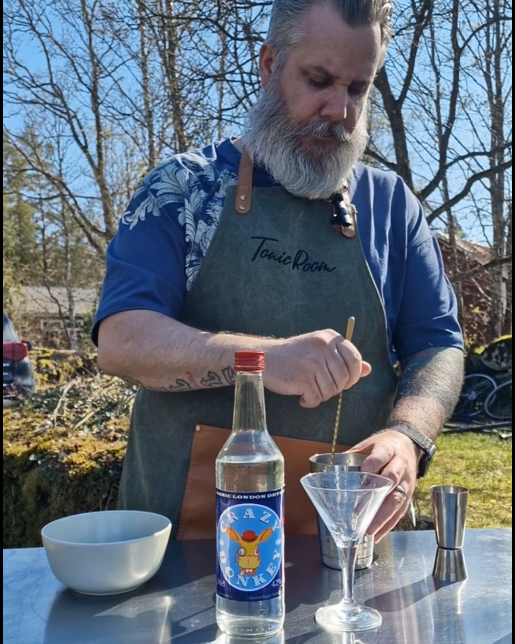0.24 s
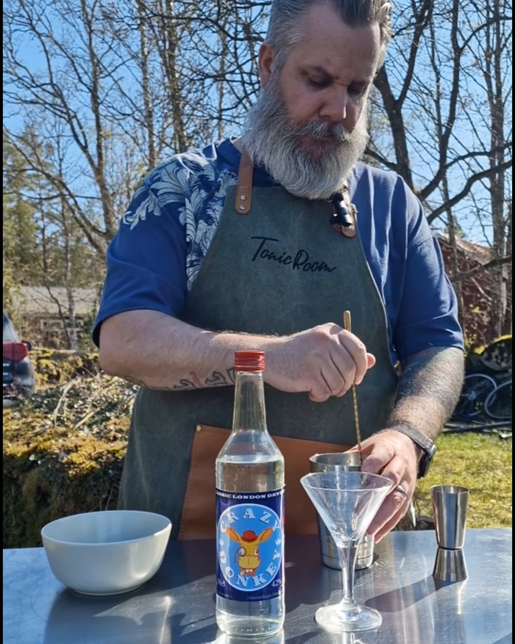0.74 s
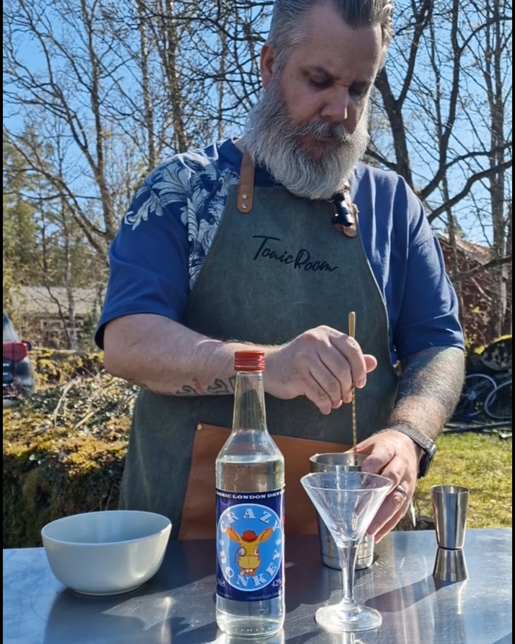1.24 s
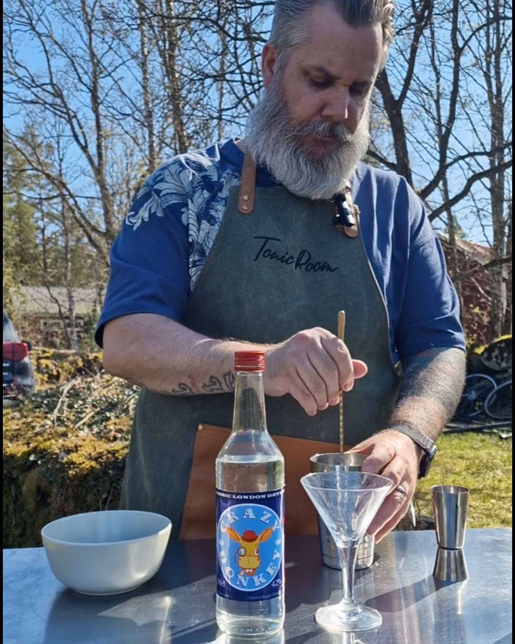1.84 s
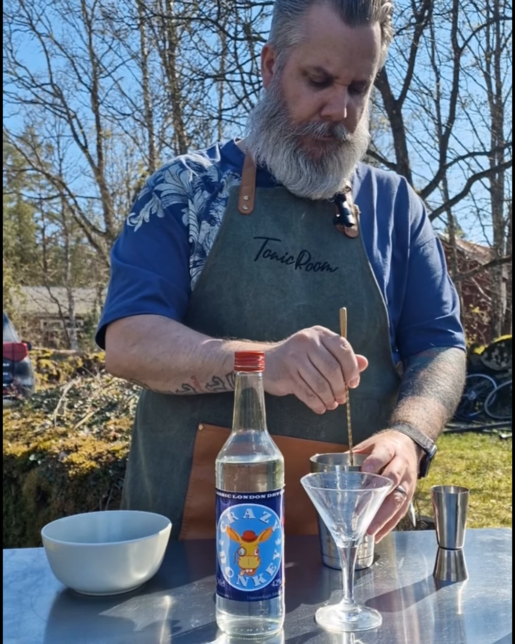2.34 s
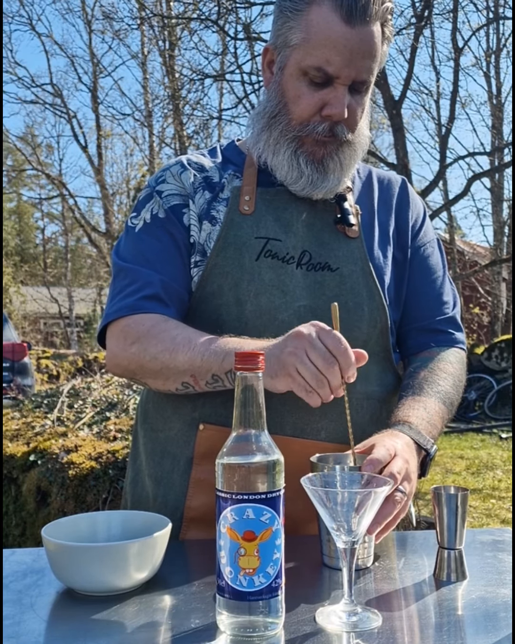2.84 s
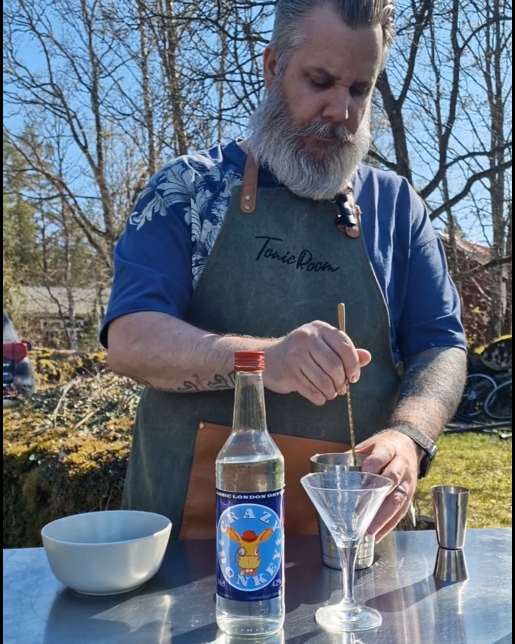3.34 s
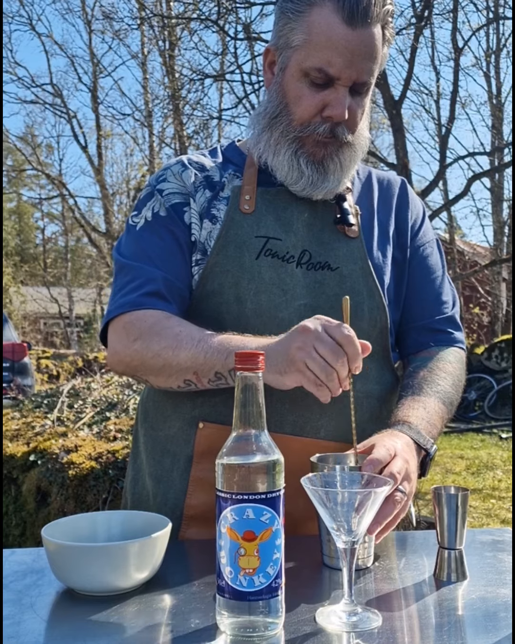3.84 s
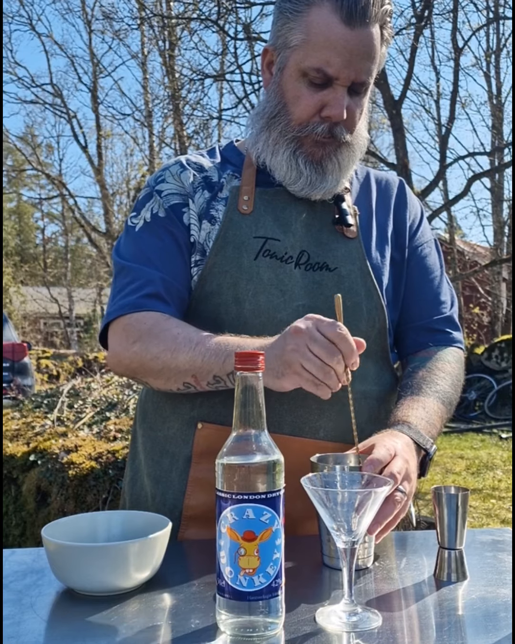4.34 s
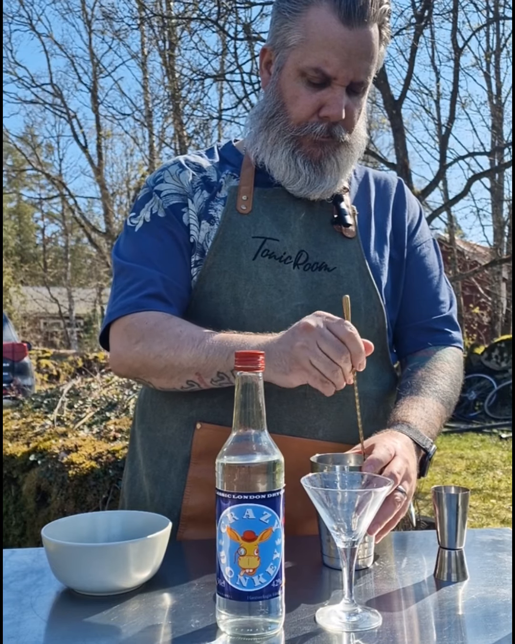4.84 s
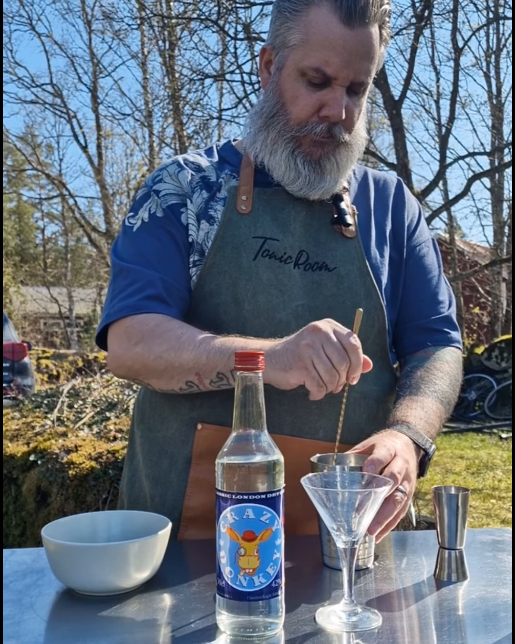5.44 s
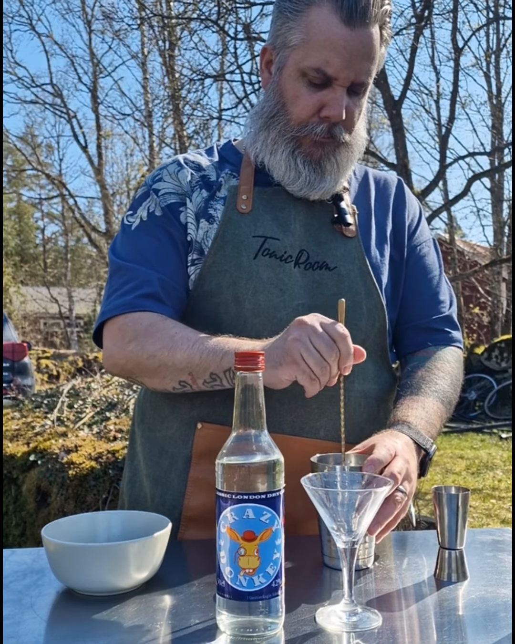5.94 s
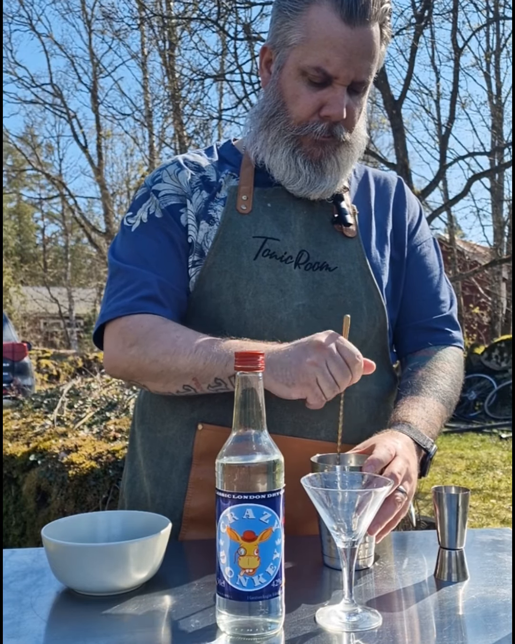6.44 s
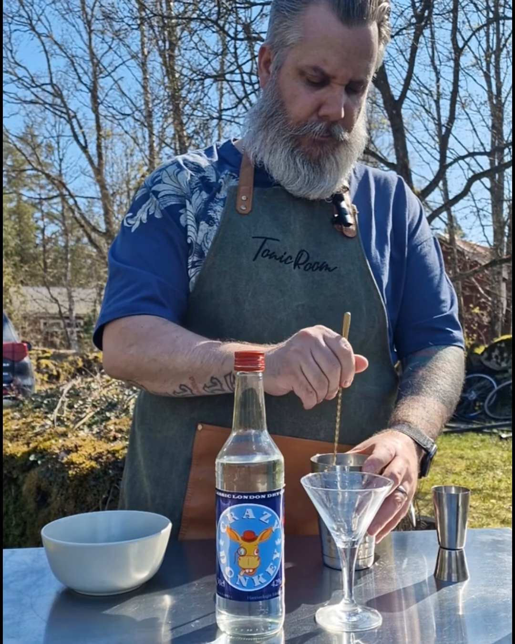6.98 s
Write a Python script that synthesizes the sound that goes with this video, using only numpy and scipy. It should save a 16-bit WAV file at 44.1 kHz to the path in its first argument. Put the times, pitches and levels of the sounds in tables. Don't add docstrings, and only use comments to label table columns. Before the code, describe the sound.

Close outdoor take of a spoon stirring ice and liquid in a steel tin on a thin metal table. A dense burst of clinks and hollow gulps, a short near-silent pause, then steady irregular knocking and gritty scraping with low table bumps. It thins out in the last second or so. Wind softly buffets the microphone over a very faint hiss.

```python
import sys
import numpy as np
from scipy import signal
from scipy.fft import rfft, irfft
from scipy.io import wavfile

SR = 44100
rng = np.random.default_rng(int(sys.argv[2]) if len(sys.argv) > 2 else 0)


def ratio_of_db(decibels):
    return 10 ** (np.asarray(decibels, float) / 20)


def bounce(signal):
    frames = np.transpose(np.atleast_2d(signal))
    limited = np.clip(frames, -1, 1)
    pcm = np.round(limited * 32767).astype(np.int16)
    wavfile.write(sys.argv[1], SR, pcm)


N = 317942

# f/Hz, level/dB, t60/s
WALL_MODES = [(1200, -24.5, 0.025), (1371, -7, 0.073), (2058, -5, 0.085), (2250, 0, 0.038),
              (2360, -9.5, 0.12), (2770, -3, 0.073), (3290, 0.5, 0.053), (3546, 0, 0.035), (3796, 1, 0.022),
              (4090, -4.5, 0.033), (4413, 1.5, 0.017), (4754, 5, 0.025), (4950, -4.5, 0.054),
              (5620, -8.5, 0.048), (6690, -9, .04), (7320, -12, 0.038), (8304, -7, 0.025),
              (8950, -11.5, 0.037), (11400, -46, .02), (13820, -27, .015)]
# f/Hz, level/dB, t60/s
CAVITY_MODES = [(517, -14, 0.17), (585.4, -9.5, 0.12), (716.6, -4, 0.13), (784.6, 3.5, 0.074),
                (860, -7, .06), (1067, -18.5, 0.063)]
# f/Hz, level/dB, t60/s
TABLE_MODES = [(70, -21, 0.094), (139.3, 1, 0.17), (239, -10.5, 0.25), (276, 4.5, 0.13),
               (409.4, -3.5, 0.09)]


def rms_one(x):
    return x / np.sqrt(np.mean(x ** 2) + 1e-20)


def in_time(rows):
    t_s, *columns = np.transpose(rows)
    return [np.interp(np.arange(N) / SR, t_s, column) for column in columns]


def band(x, low_hz, high_hz):
    return signal.sosfilt(signal.butter(2, [low_hz, high_hz], "band", fs=SR, output="sos"), x)


def drift(rate_hz):
    hop = 40
    pole = np.exp(-2 * np.pi * rate_hz * hop / SR)
    noise = rng.standard_normal(N // hop + 2002)
    slow = signal.lfilter([1], [1, -2 * pole, pole * pole], noise)[2000:]
    return np.interp(np.arange(N) / hop, np.arange(len(slow)), rms_one(slow))


def ring(force, f_hz, t60_s):
    radius = ratio_of_db(-60 / (t60_s * SR))
    angle = 2 * np.pi * f_hz / SR
    feedback = [1, -2 * radius * np.cos(angle), radius * radius]
    return signal.lfilter([0, np.sin(angle)], feedback, force + 1e-18)


def place(shapes, times_s):
    length = shapes.shape[1]
    out = np.zeros(N + length)
    starts = np.round(np.asarray(times_s) * SR).astype(int)
    np.add.at(out, starts[:, None] + np.arange(length), shapes)
    return out[:N]


def garden():
    # f/Hz, level/dB
    spectrum = [(24, -50), (40, -19.5), (643, -18.5), (765, -19), (1110, -29.5), (2850, -16.5),
                (3300, -17.5), (3830, -14.5), (15000, -43.5)]
    knot_hz, knot_db = np.transpose(spectrum)
    f_hz = np.maximum(np.arange(N // 2 + 1) * SR / N, 20)
    colour = ratio_of_db(np.interp(np.log(f_hz), np.log(knot_hz), knot_db))
    hiss = rms_one(irfft(rfft(rng.standard_normal(N)) * colour, N))
    return ratio_of_db(-61 + 2.4 * drift(6.2)) * hiss


def wind():
    # t/s, buffet level/dB
    gusts = [(0.0, -48), (0.16, -22), (0.2, -42), (0.66, -35.5), (1.26, -81), (1.55, -64), (1.72, -11.5),
             (2.09, -14), (2.21, -38), (2.71, -35.5), (2.79, -23), (3.13, -71), (3.31, -36), (3.47, -56),
             (3.55, -41), (3.82, -72), (4.01, -8), (4.2, -22), (4.24, -37), (4.56, -20.5), (4.6, -49),
             (4.86, -34), (4.92, -48), (5.0, -24), (5.16, -58), (5.32, -28), (5.38, -77), (5.88, -30.5),
             (6.0, -74.5), (6.26, -71.5), (6.4, -10.5), (6.93, -35), (7.21, -31)]
    buffet_db, = in_time(gusts)
    lumps = ratio_of_db(3.0 * drift(13))
    low = rms_one(band(band(rng.standard_normal(N), 53, 126), 35, 290))
    edge = rms_one(band(rng.standard_normal(N), 210, 540))
    return ratio_of_db(buffet_db) * rms_one(lumps * (low + ratio_of_db(-25.5) * lumps * edge))


def grit(per_s, spread_db):
    sizes = ratio_of_db(spread_db * np.minimum(rng.exponential(1, N), 5))
    signs = rng.choice([-1, 1], N)
    return sizes * signs * (rng.random(N) < per_s / SR)


def grind(modes, contacts, wander_db):
    out = np.zeros(N)
    for f_hz, level_db, t60_s in modes:
        force = contacts * ratio_of_db(level_db + wander_db * drift(9.3))
        out += ring(force, f_hz, t60_s)
    return rms_one(out)


def stir():
    # t/s, wall level/dB, cavity level/dB, table level/dB
    strokes = [(0.0, -26.5, -22.5, -38), (0.16, -32, -34.5, -61), (0.38, -27, -37.5, -36),
               (0.56, -30.5, -21, -44), (0.74, -56.5, -35.5, -39), (1.06, -50, -54, -64),
               (1.4, -61, -53, -69), (1.65, -25.5, -34, -56), (1.79, -42, -47, -37), (2.01, -29, -24, -29),
               (2.25, -34.5, -26, -43), (2.41, -40, -47, -49), (2.65, -35, -35.5, -60),
               (2.85, -38.5, -19, -58), (3.01, -37, -42, -58), (3.21, -41.5, -33, -60),
               (3.41, -27, -25.5, -45), (3.69, -41.5, -32, -50), (3.95, -25, -30, -54),
               (4.1, -34.5, -53, -42), (4.36, -43, -37, -50), (4.54, -28.5, -42.5, -37),
               (4.86, -25.5, -23, -43.5), (5.16, -37.5, -62, -59), (5.3, -26, -37, -57),
               (5.52, -65, -46.5, -43.5), (5.7, -36.5, -56, -45), (5.78, -44, -46, -45),
               (5.94, -51, -56, -58), (6.28, -72, -95, -96), (6.49, -46.5, -44, -51),
               (6.87, -38.5, -38, -45.5), (7.21, -35, -35, -55)]
    wall_db, cavity_db, table_db = in_time(strokes)
    contacts = grit(per_s=1500 * ratio_of_db(3.6 * drift(25)), spread_db=3.0)
    scrape = rms_one(band(contacts, 1300, 9800))
    wall = grind(WALL_MODES, contacts, wander_db=11.5) + ratio_of_db(-20) * scrape
    cavity = grind(CAVITY_MODES, contacts, wander_db=11.0)
    table = grind(TABLE_MODES[1:], contacts, wander_db=1.5)
    return ratio_of_db(wall_db) * wall + ratio_of_db(cavity_db) * cavity + ratio_of_db(table_db) * table


def knocks():
    # t/s, clink peak/dB, cavity level/dB, table level/dB, brightest ring f/Hz, rattle length/s
    hits = [(0.0226, -16.5, -12.5, -13, 2700, 0.012), (0.084, -13.5, -20.5, -29, 3840, 0.0053),
            (0.104, -7, -33, -36, 3080, 0.0069), (0.1302, -4, -4, -36, 2385, 0.0062),
            (0.173, -6, -14, -48, 3204, 0.02), (0.2008, -7.5, -39, -25.5, 3430, 0.015),
            (0.2435, -8, -32.5, -23, 2590, 0.013), (0.2753, -10.5, -50, -50, 2280, 0.008),
            (0.3481, -38, -31.5, -33.5, 2800, 0.008), (0.381, -8.5, -17, -37.5, 2140, 0.008),
            (0.4314, -8, -17, -28.5, 2050, 0.016), (0.478, -1, -5, -10, 2035, 0.008),
            (0.542, -15.5, -21.5, -38.5, 2110, 0.0033), (0.582, -19.5, -53, -42.5, 2060, 0.018),
            (0.6115, -9.5, -20.5, -22, 2600, 0.008), (0.636, -11.5, -23.5, -40, 3525, 0.008),
            (0.6603, -13, -42, -33, 2075, 0.0091), (0.741, -24, -31, -35, 2190, 0.014),
            (0.916, -6.5, -33, -57, 3595, 0.02), (1.445, -14.5, -51, -69, 4210, 0.02),
            (1.5434, -20.5, -58, -43, 3160, 0.02), (1.571, -17, -33, -41, 2834, 0.014),
            (1.6385, -20, -25, -25, 4160, 0.011), (1.727, -42, -39, -27, 3200, 0.0097),
            (1.7457, -22.5, -33.5, -36, 3150, 0.0071), (1.8672, -24, -30, -19.5, 2720, 0.0061),
            (2.034, -20, -34.5, -6, 3360, 0.019), (2.0408, -15.5, -16, -17.5, 1920, 0.008),
            (2.0697, -17, -19, -23, 2770, 0.016), (2.0964, -6, -15.5, -31, 2880, 0.013),
            (2.2792, -20, -13, -23.5, 2800, 0.012), (2.3258, -13.5, -29.5, -41, 3750, 0.008),
            (2.344, -11.5, -22, -19.5, 2910, 0.0092), (2.367, -16, -33.5, -20, 2840, 0.013),
            (2.4039, -18.5, -33, -13.5, 2820, 0.0091), (2.557, -13.5, -37, -34, 2240, 0.017),
            (2.6498, -7, -20, -35, 2003, 0.02), (2.7882, -6.5, -7.5, -18, 2724, 0.0087),
            (2.8537, -17, -21, -33, 2490, 0.02), (2.8715, -4.5, -19.5, -52, 4860, 0.02),
            (2.8916, -3, -15, -19.5, 3730, 0.02), (2.9457, -13.5, -6, -29.5, 2150, 0.012),
            (2.9891, -20.5, -17, -51, 3270, 0.0045), (3.0034, -11.5, -41.5, -28, 1945, 0.008),
            (3.0243, -9.5, -19, -44, 3320, 0.012), (3.1433, -18, -28, -55, 2060, 0.012),
            (3.1736, -21, -22.5, -26, 2720, 0.012), (3.191, -18, -44, -32, 2800, 0.008),
            (3.2125, -15, -25.5, -25, 2630, 0.008), (3.264, -25, -29, -46, 3130, 0.0066),
            (3.2863, -32, -39, -19, 3100, 0.0053), (3.2969, -5.5, -8.5, -8.5, 2786, 0.01),
            (3.3603, -8.5, -20, -36.5, 3180, 0.008), (3.3773, -10.5, -35, -48, 2040, 0.0068),
            (3.3923, -10.5, -25.5, -19, 1850, 0.0091), (3.477, -23, -30.5, -41, 2810, 0.0069),
            (3.5386, -5.5, -11, -0.5, 2340, 0.012), (3.6123, -25, -32, -30, 2160, 0.011),
            (3.7803, -39, -56, -51, 2700, 0.008), (3.821, -22.5, -50, -47, 4640, 0.005),
            (3.8353, -8, -50, -66, 4630, 0.01), (3.916, -18, -26.5, -17, 2210, 0.008),
            (3.9603, -14, -28.5, -40, 3405, 0.0093), (4.0035, -15.5, -34.5, -15.5, 4210, 0.012),
            (4.0992, -26, -47, -32, 3330, 0.008), (4.1064, -16, -42, -25, 3326, 0.012),
            (4.3315, -12, -17.5, -18.5, 2740, 0.02), (4.38, -19.5, -35.5, -22, 5100, 0.0075),
            (4.416, -25.5, -38, -17.5, 1820, 0.013), (4.4527, -32.5, -30, -22, 2360, 0.011),
            (4.5406, -15.5, -25, -24.5, 2080, 0.0067), (4.586, -12.5, -35, -48, 4800, 0.008),
            (4.6097, -5.5, -32.5, -50, 3290, 0.011), (4.663, -23, -51, -25.5, 4570, 0.0052),
            (4.7222, -17.5, -23.5, -27, 2640, 0.015), (4.789, -29, -39, -37, 3240, 0.0069),
            (4.8292, -6, -16.5, -9.5, 2000, 0.0045), (4.8773, -11, -47.5, -29, 3150, 0.008),
            (4.8848, -9.5, -43, -26.5, 2180, 0.012), (4.9534, -17.5, -35.5, -28, 2190, 0.0045),
            (4.969, -12.5, -24, -29.5, 2020, 0.0091), (4.984, -4, -23, -35.5, 2025, 0.0072),
            (5.005, -10.5, -16, -13, 3350, 0.02), (5.0544, -16.5, -22.5, -33, 3700, 0.0094),
            (5.1208, -44.5, -43.5, -50.5, 5030, 0.0091), (5.1677, -17.5, -47, -59, 2200, 0.01),
            (5.1934, -14.5, -40, -35, 3310, 0.0074), (5.236, -5.5, -17.5, -23, 2200, 0.019),
            (5.291, -6.5, -22, -37.5, 2455, 0.011), (5.4554, -17.5, -37.5, -41, 2190, 0.0051),
            (5.474, -12, -22, -16.5, 2200, 0.0037), (5.5484, -1, -25.5, -55.5, 4090, 0.02),
            (5.637, -15, -9.5, -13.5, 2680, 0.02), (5.671, -14, -22.5, -42.5, 2690, 0.0063),
            (5.7155, -4.5, -31, -40, 2110, 0.0065), (5.747, -9.5, -58.5, -47, 2540, 0.01),
            (5.8, -17, -44.5, -37, 2470, 0.02), (5.8396, -14, -20, -22, 2123, 0.02),
            (6.2586, -13, -42, -51, 2090, 0.02), (6.2956, -11, -24.5, -48, 3730, 0.02),
            (6.6774, -32, -36.5, -24, 4830, 0.014), (6.889, -29, -59, -41, 4830, 0.0072),
            (6.907, -24, -36.5, -44, 4950, 0.01), (7.1404, -14.5, -34.5, -36, 4610, 0.00717),
            (7.1591, -11.5, -15, -15.5, 1955, 0.0095)]
    t_hit_s, clink_db, cavity_db, table_db, bright_hz, rattle_s = np.transpose(hits)
    count = len(t_hit_s)
    t_s = np.arange(1000) / SR

    bounces = (rng.random((count, 1000)) < 0.06) * rng.uniform(-1, 1, (count, 1000))
    rattle = bounces * np.exp(-t_s / np.clip(rattle_s, 0.001, 0.03)[:, None])
    rattle[:, 0] = 1
    rattle /= np.sqrt(np.sum(rattle ** 2, axis=1, keepdims=True))

    def strike(level_db):
        return place(rattle * ratio_of_db(level_db)[:, None], t_hit_s)

    def luck():
        return rng.uniform(-1, 1, count)

    out = band(strike(clink_db - 21), 2500, 21000)
    cube = np.sin(2 * np.pi * bright_hz[:, None] * t_s)
    cube *= np.exp(-t_s / 0.0057) * (1 - np.exp(-t_s / 0.00033))
    out += place(cube * ratio_of_db(clink_db - 1)[:, None], t_hit_s)

    for f_hz, level_db, t60_s in WALL_MODES:
        octaves_off = np.minimum(np.abs(np.log2(f_hz / bright_hz)), 1.2)
        out += ring(strike(clink_db + level_db - 8.5 - 9 * octaves_off + 7 * luck()), f_hz, t60_s)
    for f_hz, level_db, t60_s in CAVITY_MODES:
        out += ring(strike(cavity_db + level_db + 1.5 + 9.3 * luck()), f_hz, t60_s)
    for f_hz, level_db, t60_s in TABLE_MODES:
        out += ring(strike(table_db + level_db - 7.66 + 3 * luck()), f_hz, t60_s)
    return out


def gulps():
    # t/s, peak/dB, start f/Hz, end f/Hz, length/s
    pockets = [(0.028, 1.5, 710, 905, .022), (0.053, -2, 970, 766, 0.0072), (0.1, -15, 1910, 3060, 0.013),
               (0.465, -5.5, 750, 860, 0.039), (.508, -7.5, 1075, 765, 0.0091),
               (.577, -12.5, 1894, 2250, 0.013), (2.87, -3.5, 940, 1302, 0.026),
               (2.94, -17.5, 587, 656, 0.059), (2.992, -3.5, 752, 1037, 0.012),
               (3.004, -18.5, 1200, 2130, 0.0084), (3.912, -11, 2005, 2250, 0.01),
               (6.457, -24.5, 850, 963, 0.055)]
    t_gulp_s, peak_db, start_hz, end_hz, length_s = np.transpose(pockets)[:, :, None]
    part = np.minimum(np.arange(4000) / SR / length_s, 1)
    f_hz = start_hz + (end_hz - start_hz) * part
    tone = np.sin(2 * np.pi * np.cumsum(f_hz, axis=1) / SR)
    swell = np.sin(np.pi * part ** 0.68) ** 0.28
    return place(ratio_of_db(peak_db) * swell * tone, t_gulp_s[:, 0])


def scene():
    tin = stir() + knocks() + gulps()
    lag = int(0.000942 * SR)
    tin[lag:] += ratio_of_db(-27) * tin[:-lag]
    return (garden() + wind() + tin)[None]


def band_limit(x):
    return signal.sosfilt(signal.butter(12, 16140, fs=SR, output="sos"), x)


def record(dry):
    mix = 0.84 * np.tanh(dry / 1.124)
    return band_limit(mix)


dry = scene()
out = record(dry)
bounce(out)
```